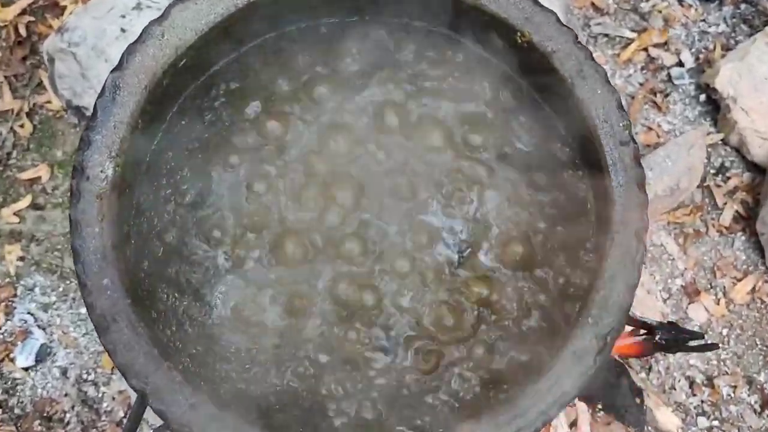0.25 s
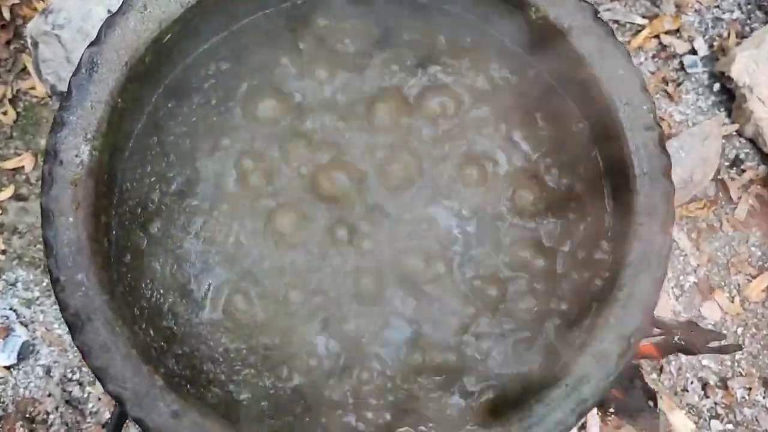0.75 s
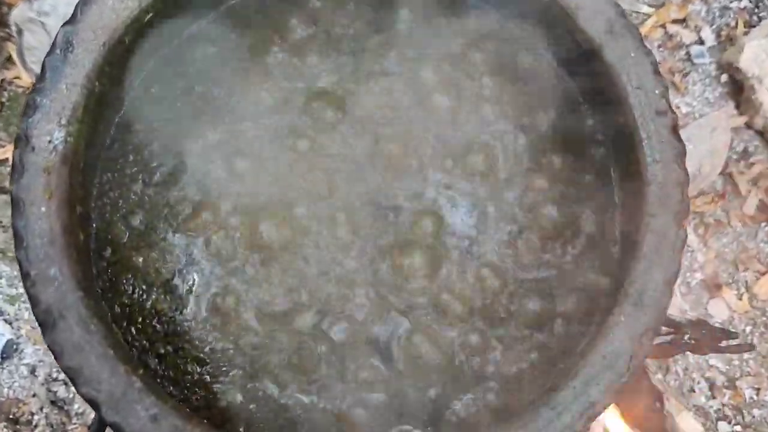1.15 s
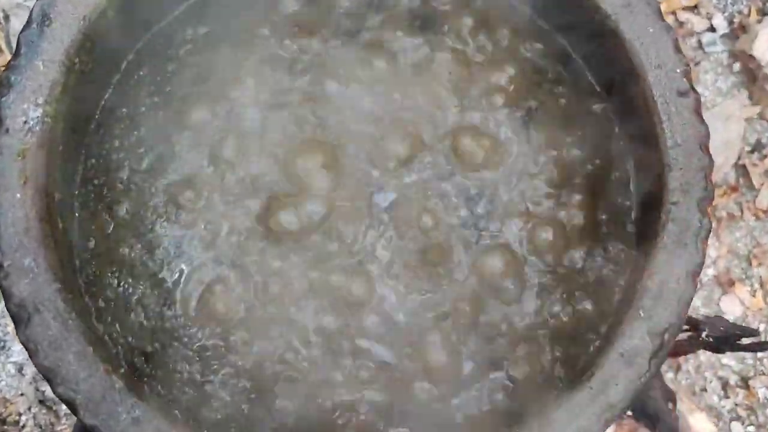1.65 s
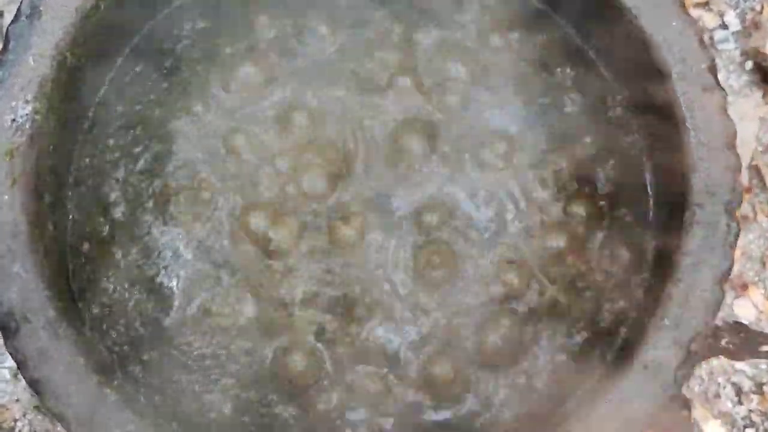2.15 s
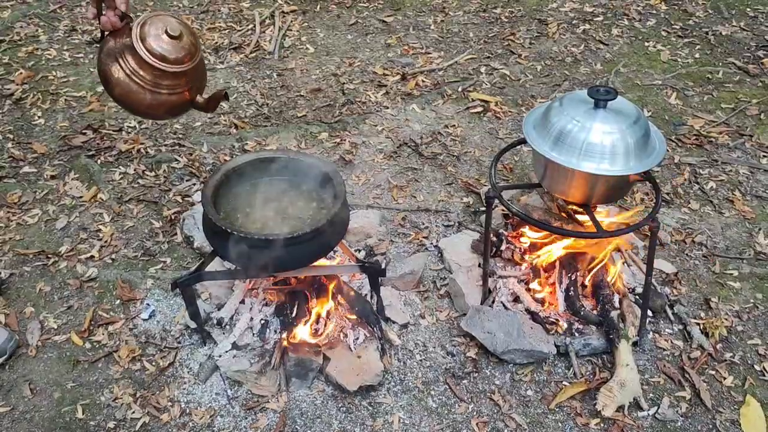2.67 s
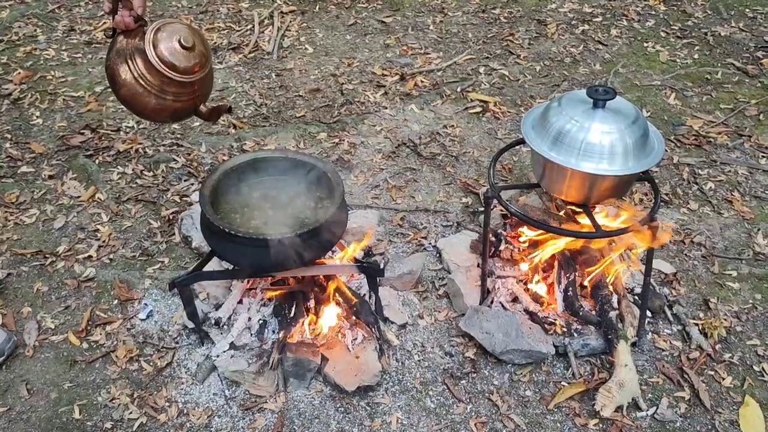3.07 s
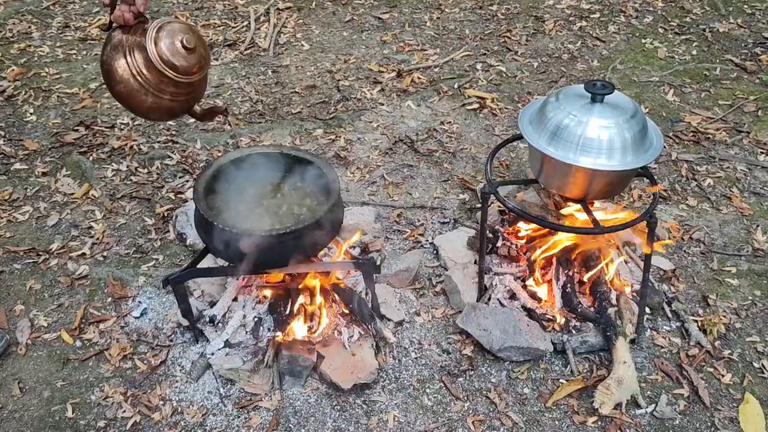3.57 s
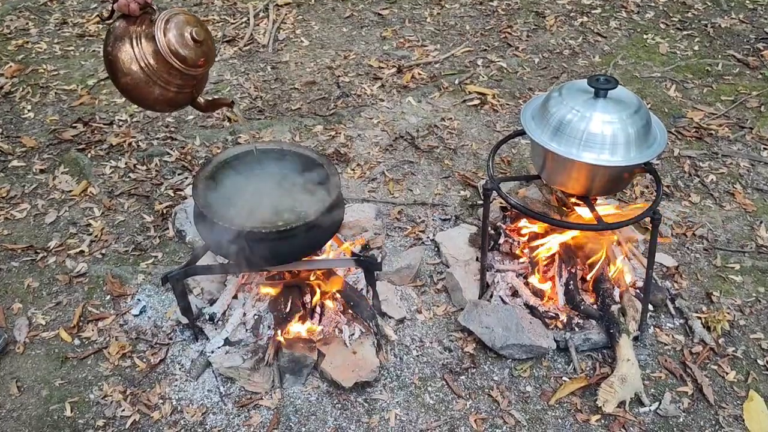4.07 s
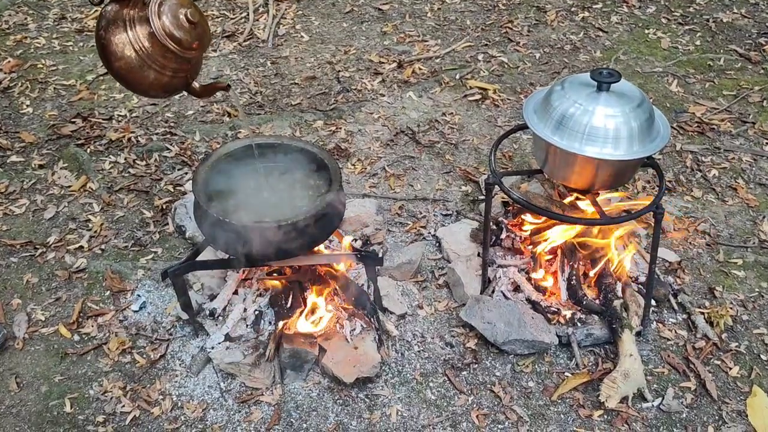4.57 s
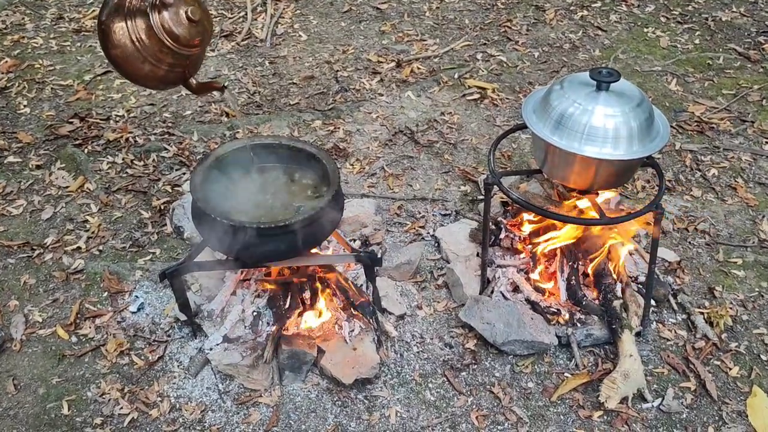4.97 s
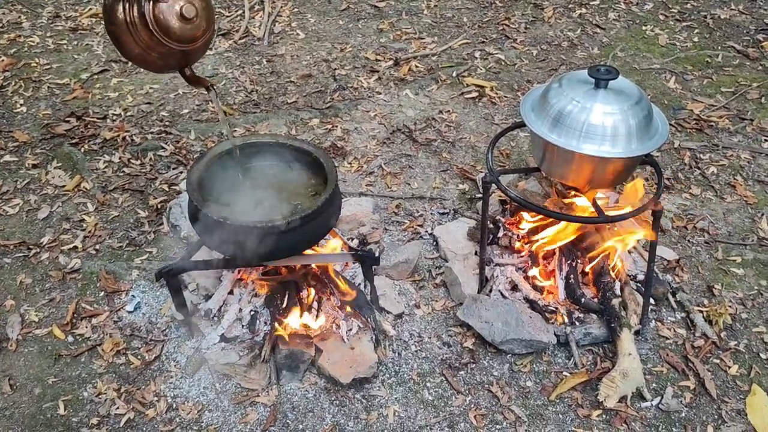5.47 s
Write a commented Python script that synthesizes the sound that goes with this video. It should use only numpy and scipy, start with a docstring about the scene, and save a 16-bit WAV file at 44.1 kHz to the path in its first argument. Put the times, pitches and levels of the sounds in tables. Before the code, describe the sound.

From 0 to 2.24 seconds the microphone is right above a pot of water boiling hard outdoors. Dense low bubbling churns continuously; larger bubbles burst irregularly as short, hollow, upward-chirping blops, with occasional soft low thuds. Beneath is a fluttering flame rumble, above it a thin, wide fizz. A sharp snap comes at 0.24, and a tight group of bright cracks at about 1.4 to 1.57. The sound stops abruptly for a few hundredths of a second, then fades in quickly from 2.28, much quieter and a few steps away: softer bubbling, low fire rumble, faint sizzle and small crackles, including a tick at 3.7. Isolated plinks appear around 3.5. From about 4.2 a thin stream of water lands in the pot, a high glassy trickle with plinks, patter and clumped little splashes, uneven and continuing to the end near 5.7. Clearer cracks strike at 4.9, 5.26 and 5.39. Echoes are short and sparse.

```python
"""Pot boiling over a wood fire

Outdoors, with a microphone just above the pot: water boils hard over rumbling flames, with sharp cracks of
wood and spatter. After a brief silence the view opens a few steps away: softer bubbling, fire, and the
plinks and splashes of a thin stream of water falling from a kettle. Bubbles and drops are decaying sines
that rise in pitch; cracks are short noise bursts; flames are coloured noise; sparse echoes surround them."""
import sys
import numpy as np
from scipy import signal
from scipy.fft import rfft, irfft
from scipy.io import wavfile
from scipy.ndimage import uniform_filter1d

SR = 44100
rng = np.random.default_rng(int(sys.argv[2]) if len(sys.argv) > 2 else 0)


def master(y):
    """Save y as 16-bit WAV."""
    cut = np.clip(np.atleast_2d(y).T, -1, 1)
    pcm = np.round(cut * 32767)  # scale
    wavfile.write(sys.argv[1], SR, pcm.astype(np.int16))


N = 252252
TIME = np.arange(N) / SR
NEAR_END, FAR_START, FADE_S = 2.2405, 2.277, 0.14  # (s) the close view stops, the wide view fades in
TRICKLE_FROM = 4.22  # (s) the stream takes hold
# share of a large bubble or plink that rings on, and its decay time (s)
LINGER, LINGER_S = 0.035, 0.0064
ROUNDING = 0.039  # a bubble that rings long also swells slowly, over this share of its decay time


def amp(db):
    """Decibels to gain."""
    return 10 ** (np.asarray(db) / 20)


def unit(x):
    """Scales to rms 1."""
    return x / np.sqrt(np.mean(x ** 2) + 1e-20)


def read(points, hz):
    """Reads a spectrum on a log-frequency axis."""
    f, value = np.transpose(points)
    return np.interp(np.log(hz + 1), np.log(f + 1), value)


def colour(x, points):
    """Filters by a spectrum in dB."""
    size = x.shape[-1]
    gain = amp(read(points, np.fft.rfftfreq(size, 1 / SR)))
    return irfft(rfft(x) * gain, size)


def add(mix, s, sound):
    """Adds a stereo sound at time s."""
    part = mix[:, max(round(s * SR), 0):][:, :sound.shape[1]]
    part += sound[:, :part.shape[1]]


def wander(size):
    """Smooth random drift of rms 1 that changes over about size samples."""
    smooth = uniform_filter1d(rng.standard_normal(N), size)
    return unit(uniform_filter1d(smooth, size // 2))


def scatter(x, wet_db, t60, width, size=5000):
    """Pot wall, stones and ground return a short spray of echoes, partly shared by both microphone ports."""
    t = np.arange(size) / SR
    sparse = (rng.random((3, size)) < 0.04) * (t > 0.002)
    taps = rng.standard_normal((3, size)) * sparse * amp(-60 * t / t60)
    taps = taps[0] + width * taps[1:]
    taps /= np.linalg.norm(taps, axis=1, keepdims=True)
    echoes = signal.oaconvolve(x.mean(0)[None], taps, axes=1)[:, :N]
    return x + amp(wet_db) * echoes


def ring(hz, decay, glide, lag, side_db, swell=0.52, linger=0, size=1500):
    """A bubble's air pocket swells, rises in pitch and dies, a share lingering; one port hears it later."""
    t = np.arange(size) / SR
    t = np.maximum(t - np.maximum([[lag], [-lag]], 0), 0)
    dying = np.exp(-t / max(decay, 1e-5)) + linger * np.exp(-t / LINGER_S)
    shape = (1 - np.exp(-t * hz / swell)) ** 2 * dying  # swell is in cycles
    wave = np.sin(2 * np.pi * hz * t * (1 + glide * t))
    return amp([[side_db / 2], [-side_db / 2]]) * wave * shape / shape.max()


def bubbles(rows, glide, spread_s, side_db, swell=0.098, linger=0, wide_hz=1300):
    """Each bubble rings at its own place, random unless its row gives one; low random ones sit central."""
    out = np.zeros((2, N))
    draws = rng.standard_normal((len(rows), 3))
    for (s, db, hz, decay, *place), (a, b, c) in zip(rows, draws):
        width = min(hz / wide_hz, 1) ** 2
        side = place[0] if place else side_db * width * c
        slow_swell = swell + ROUNDING * decay * hz
        sound = ring(hz, decay, glide * (1 + a / 2), spread_s * width * b, side, slow_swell, linger)
        add(out, s, amp(db) * sound)
    return out


def swarm(per_s, low_hz, high_hz, cycles, scatter_db, spread_s, side_db, count=120):
    """Countless small bubbles over a range of pitches, most faint and a few strong."""
    out = np.zeros((2, N))
    for hz in np.geomspace(low_hz, high_hz, count):
        a, b, c = rng.standard_normal(3)
        small = hz / high_hz
        decay = cycles * np.exp(a / 3) / hz
        grain = small * ring(hz, decay, 6.0, spread_s * small * b, side_db * small * c, size=900)
        when, strength, chance = rng.random(size=(3, 200))
        live = chance < per_s * TIME[-1] / count / len(chance)
        gains = amp(-scatter_db * np.log(strength[live] + 0.011))
        for s, gain in zip(when[live] * TIME[-1], gains):
            add(out, s, gain * grain)
    return out


def moments(start, end, per_s, count=120):
    """Irregular times, one somewhere in each interval, each with three clipped normal draws of its own."""
    s = start + (np.arange(count) + rng.random(count)) / per_s
    draws = np.clip(rng.standard_normal((count, 3)), -2, 2)
    return s[s < end], *draws[s < end].T


def bubbling(start, end, per_s, db, scatter_db, hz, octaves, cycles, ring_scatter=0.54):
    """Random bubbles of one kind, scattered in level and pitch; those that ring longer peak lower."""
    s, loud, pitch, length = moments(start, end, per_s)
    hz, longer = hz * 2 ** (octaves * pitch), np.exp(ring_scatter * length)
    level = db + scatter_db * loud - 10 * np.log10(longer)
    return np.transpose([s, level, hz, longer * cycles / hz])


def droplets(rows, below_db, after_s, higher, scatter_octaves, cycles, count):
    """Each burst, crack or splash sheds a few bubbles just after it, scattered in pitch and level."""
    s, db, hz = np.repeat(np.array(rows)[:, :3], count, axis=0).T
    delay, pitch, strength = rng.standard_normal((len(s), 3)).T
    hz = np.minimum(hz * higher * 2 ** (scatter_octaves * pitch), SR / 3)
    return np.transpose([s + after_s * abs(delay), db + below_db + 2 * strength, hz, cycles / hz])


# Likeness of the fire at the two ports. Each row: frequency in Hz, left-right correlation (0 to 1).
SAME = [(20, 0.15), (100, 0.98), (700, 0.77), (1400, 0.023), (2500, 0), (16000, 0)]


def flames(spectrum, flutter_db):
    """Fire as fluttering coloured noise: a rumble much alike in both ports under a thin wide hiss."""
    a, b = rfft(rng.standard_normal((2, N)))
    same = np.clip(read(SAME, np.fft.rfftfreq(N, 1 / SR)), -1, 1)
    right = same * a + np.sqrt(1 - same ** 2) * b
    noise = irfft(np.array([a, right]), N)
    return colour(noise, spectrum) * amp(flutter_db * wander(size=1200))


def boil(curve, churn, fizz, fire, churn_db, fizz_db, fire_db):
    """Churning, fizz and flames each follow their own strength curve, plus a trim in dB."""
    s, *levels = np.transpose(curve)
    layers = zip((churn, fizz, fire), levels, (churn_db, fizz_db, fire_db))
    return sum(unit(sound) * amp(np.interp(TIME, s, level) + db) for sound, level, db in layers)


# Strength just above the rim. Each row: time in seconds, then churning, fizz and flames in dB before trims.
BOIL_NEAR = [(0.0, -50.5, -69, -56.5), (0.35, -50.5, -67, -57), (1.5, -49.5, -67.5, -59),
             (2.2, -47.5, -67.5, -60)]
# Colour of the small bubbles up close. Each row: frequency in Hz, gain in dB.
CHURN_NEAR = [(150, -11.5), (300, -15), (450, -12), (640, -2.5), (820, -7.5), (1050, -17.5), (1400, -18.5),
              (1700, -28), (2100, -48.5), (3000, -45.5)]
# Colour of the fizz up close. Each row: frequency in Hz, gain in dB.
FIZZ_NEAR = [(1000, 14), (2100, -15.5), (3100, -3.5), (3900, -9), (5200, -1), (6600, -2.5), (7800, -8.5),
             (9200, -6.5), (10500, -14.5), (12200, -18), (14000, -13.5), (16000, -19)]
# Colour of flames and steam up close. Each row: frequency in Hz, gain in dB.
FLAME_NEAR = [(15, -11), (35, -0.5), (60, -1), (100, 3.5), (180, 1.5), (300, -4.5), (500, 0.5),
              (1000, -12.5), (2000, -22.5), (5000, -26.5), (9000, -31), (16000, -31)]


def near_pot():
    """The boil from just above the rim: swarms of low bubbles churn, swarms of high ones fizz in clumps."""
    churn = swarm(per_s=1100, low_hz=220, high_hz=2200, cycles=1.3, scatter_db=1.8, spread_s=0.0003, side_db=3)
    fizz = swarm(per_s=2700, low_hz=1900, high_hz=14500, cycles=3.8, scatter_db=3.6,
                 spread_s=0.00026, side_db=8)
    fizz = scatter(colour(fizz, FIZZ_NEAR), wet_db=-8.0, t60=0.0097, width=2.1)
    fizz = fizz * amp(1.3 * wander(size=1100))
    fire = flames(FLAME_NEAR, flutter_db=1.6)
    return boil(BOIL_NEAR, colour(churn, CHURN_NEAR), fizz, fire, churn_db=1.0, fizz_db=11.0, fire_db=6.5)


# The largest bubbles bursting. Each row: start in seconds, level in dB before the pot colours it,
# starting pitch in Hz, decay time in seconds, left-right difference in dB.
BUBBLES = [(0.0041, -34.5, 1010, 0.0012, 1), (0.0475, -36, 910, .0005, 4), (0.0689, -29, 830, 0.0021, -2),
           (0.21, -29.5, 1150, 0.00087, 1), (0.2845, -36, 1460, .002, -4), (0.2945, -40.5, 1300, .005, -3),
           (0.375, -29, 1165, 0.0012, 3), (0.4594, -28.5, 984, 0.00095, -5.5),
           (0.4845, -39, 1060, 0.0011, 5), (0.5173, -38, 1350, 0.006, -5), (0.5386, -34, 686, 0.0024, 1),
           (0.592, -32, 806, 0.0018, 1), (0.6293, -29.5, 880, 0.00042, -2), (0.6807, -32.5, 670, 0.0011, 1),
           (0.6875, -31.5, 1320, .0038, 9), (0.6976, -28, 1270, .0035, -2), (0.7183, -38, 1000, 0.0023, -2),
           (0.7398, -38, 790, 0.0029, 3), (0.741, -46, 1270, .002, 1), (0.8102, -39, 790, 0.0027, 1),
           (0.838, -34, 1060, 0.00081, 1), (0.861, -39, 1240, 0.0022, 0), (0.8833, -30.5, 1054, 0.00039, 3),
           (0.9016, -35.5, 574, 0.0019, -1), (0.9591, -42, 550, 0.0012, 6), (1.0265, -36, 770, 0.0016, 0),
           (1.0436, -35.5, 600, 0.0044, 1), (1.1199, -41, 1050, 0.0017, 13), (1.161, -30, 830, 0.00083, 2),
           (1.191, -34.5, 700, 0.0025, 0), (1.2145, -34, 650, 0.0023, 0), (1.216, -40, 1270, .0015, 8),
           (1.2421, -39, 730, 0.0021, 2), (1.261, -36.5, 1320, 0.003, -1), (1.2662, -32.5, 653, 0.0041, 0),
           (1.2997, -37.5, 623, 0.0047, 1), (1.3156, -33, 870, 0.00083, 1), (1.3888, -27.5, 710, 0.0007, 2),
           (1.436, -30.5, 720, 0.0009, 1), (1.491, -35, 1020, 0.00056, 1.5),
           (1.5235, -31.5, 1100, 0.00042, 10), (1.535, -32.5, 1600, 0.0008, -12),
           (1.5733, -31.5, 1280, 0.0015, -8), (1.5858, -35, 533, 0.0023, 3), (1.6487, -32, 677, 0.0059, 1),
           (1.6618, -41, 690, 0.0025, -1), (1.6933, -35.5, 830, 0.002, 0), (1.735, -38, 910, 0.0007, 7),
           (1.7632, -39, 637, 0.0049, 2), (1.8052, -41, 1350, 0.0018, 3), (1.8211, -36, 1250, 0.0022, -1.5),
           (1.8431, -37.5, 780, 0.0038, 2), (1.8638, -25, 902, 0.0014, 2),
           (1.8748, -35, 1460, 0.00077, -11), (1.9208, -37, 610, 0.0023, 2), (1.9225, -40, 1190, 0.0015, 0),
           (1.9645, -38.5, 1220, 0.00077, 11), (1.9875, -32, 585, 0.0021, 1),
           (2.0135, -36, 563, 0.0038, -1), (2.0543, -39.5, 1100, 0.0035, 11), (2.0808, -38, 555, 0.0023, 2),
           (2.0997, -41, 644, 0.0025, 3), (2.1187, -33, 570, 0.0031, 0), (2.1366, -36.5, 874, 0.0019, 4),
           (2.1452, -42, 646, .0025, -4), (2.1845, -38, 603, 0.00096, 1), (2.2083, -27, 1330, 0.0012, 9),
           (2.2229, -36.5, 690, 0.0019, -2.5), (2.3405, -53.5, 803, 0.0061, 3),
           (2.4812, -54, 1230, .003, 1), (2.483, -53, 724, 0.0033, 0), (2.5643, -42.5, 800, 0.002, 0),
           (2.6475, -52, 900, .003, 0), (2.678, -47, 1660, .003, 5), (2.6805, -49.5, 1300, 0.0028, 1),
           (2.696, -52, 1210, .003, 4), (2.729, -49, 860, .002, 0), (2.733, -57, 1300, 0.0031, -2),
           (2.7624, -50, 750, 0.0025, -3), (2.898, -48.5, 1270, 0.0024, 3), (2.9472, -49, 1210, 0.0012, 1),
           (2.9485, -51, 690, 0.0016, 0), (2.9862, -46.5, 1310, .0045, 3), (3.0208, -46, 720, 0.0016, -2),
           (3.0495, -53, 1280, .003, 0), (3.0568, -44.5, 1700, .003, 6), (3.0743, -51, 1310, 0.0028, 4),
           (3.0835, -50.5, 550, .0025, 0), (3.1622, -48.5, 646, .002, 0), (3.163, -45, 1290, 0.002, 0),
           (3.164, -51, 1780, .0025, 3), (3.172, -51, 1760, .003, 6), (3.181, -51, 690, .0025, 0),
           (3.1997, -50, 1195, 0.004, 6), (3.3616, -48, 820, 0.003, -1), (3.4097, -46.5, 1580, 0.0018, 3),
           (3.4225, -51, 1290, 0.0027, -2), (3.537, -49, 580, 0.002, 2), (3.5924, -47, 990, 0.00063, -2),
           (3.598, -51, 730, 0.0021, 2), (3.611, -51, 570, 0.004, 4), (3.664, -53, 730, .0025, 0),
           (3.685, -57, 604, .0025, 0), (3.7346, -46.5, 576, 0.0023, 2), (3.7498, -43.5, 733, 0.0012, -1),
           (3.7535, -50.5, 1290, .0025, 2), (3.773, -51, 1240, 0.0026, 0), (3.7907, -50, 1370, 0.0012, 0),
           (3.8263, -48.5, 714, 0.0013, -2), (3.9039, -50, 673, 0.0061, -1),
           (3.9214, -47, 1130, 0.00088, 0), (3.9704, -51, 580, 0.0039, 1), (4.014, -54, 860, .0025, 0),
           (4.0285, -57, 775, .0025, 0), (4.079, -52, 640, .003, -4), (4.0995, -52, 890, .002, 0),
           (4.1096, -41.5, 1360, 0.00052, -1), (4.2025, -52, 780, 0.0027, 0), (4.2895, -49, 1550, .0015, 0),
           (4.2947, -50, 616, 0.0017, 0), (4.323, -55, 860, .0025, 0), (4.4335, -53, 600, .0025, 0),
           (4.4357, -41, 1330, 0.0018, 1), (4.4534, -50.5, 636, 0.0023, -1), (4.4832, -44.5, 670, .003, 0),
           (4.4874, -40, 1350, 0.0012, -1), (4.532, -47, 614, 0.0012, -2), (4.5945, -50, 630, 0.0019, 0),
           (4.6423, -48.5, 590, 0.003, -1), (4.664, -50, 645, 0.0019, 0), (4.6917, -44, 650, 0.0012, -1),
           (4.7057, -41.5, 1260, 0.0013, 2), (4.7617, -44.5, 600, 0.0023, 0), (4.8679, -49, 696, 0.001, -1),
           (4.8929, -46, 627, 0.0026, -1), (4.8935, -50, 1300, .0015, 2), (4.9535, -47.5, 610, 0.0028, -1),
           (4.9538, -43, 1280, 0.0011, 1), (5.027, -54, 730, .0025, -2), (5.0562, -47, 670, 0.002, 0),
           (5.2057, -42.5, 644, 0.0014, -1), (5.219, -49, 600, .0025, 0), (5.263, -47.5, 616, 0.0013, 0),
           (5.2905, -51, 830, 0.0023, 0), (5.335, -53, 596, .002, 0), (5.3635, -57, 1420, .0025, 0),
           (5.4072, -48, 1260, .004, 0), (5.4342, -52, 610, 0.0023, -1), (5.4795, -49.5, 636, 0.0027, 0),
           (5.481, -48, 1300, 0.003, 2), (5.514, -45.5, 646, 0.0014, 0), (5.5436, -46, 653, 0.0012, -1),
           (5.5854, -48.5, 666, 0.0034, -3), (5.6548, -47.5, 770, 0.002, -1),
           (5.6836, -47.5, 755, 0.0024, -2)]


def rolling():
    """The steady run of ordinary bubbles, big and small, in the close view and then the wide one."""
    close, wide = (0, NEAR_END), (FAR_START + 1.2 * FADE_S, N / SR)
    big, small = dict(hz=700, octaves=0.14, cycles=1.3), dict(hz=1300, octaves=0.14, cycles=3)
    rows = np.vstack([bubbling(*close, per_s=13, db=-45, scatter_db=1.3, **big),
                      bubbling(*close, per_s=3, db=-47, scatter_db=1, **small),
                      bubbling(*wide, per_s=8, db=-57.5, scatter_db=1.3, **big),
                      bubbling(*wide, per_s=3, db=-59, scatter_db=1.2, **small)])
    apart = abs(rows[:, :1] - np.array(BUBBLES)[:, 0]).min(axis=1)
    return rows[apart > 0.017]  # (s) none bursts this close to one of the largest


# The air in the pot lifts some bands of the bubbles and dulls the rest. Each row: frequency in Hz, gain in dB.
POT = [(150, -14), (400, -3), (660, 2), (850, 1), (1050, -1), (1350, -0.5), (1650, -3.5), (2100, -10),
       (4000, -3)]


def bursts():
    """Large and ordinary bubbles chirp upward and leave small ones; torn films flick higher drops."""
    ordinary = rolling()
    parents = np.vstack([np.array(BUBBLES)[:, :4], ordinary])
    small = droplets(parents, below_db=-16, after_s=0.008, higher=1.1, scatter_octaves=0.35, cycles=3, count=2)
    blips = bubbles(BUBBLES, glide=5.5, spread_s=0.00018, side_db=0, swell=0.46, linger=LINGER)
    blips += bubbles(ordinary, glide=11, spread_s=0.00019, side_db=4.0, swell=0.7)
    blips += bubbles(small, glide=25.8, spread_s=0.0003, side_db=11.0, swell=0.62)
    film = droplets(BUBBLES, below_db=-21, after_s=0.004, higher=2.5, scatter_octaves=0.35, cycles=3, count=2)
    flicks = bubbles(film, glide=8, spread_s=0.0002, side_db=5)
    return scatter(colour(blips, POT) + flicks, wet_db=-14, t60=0.07, width=0.5)


# The heaviest low thuds of the rolling water. Each row: start in seconds, level in dB before a trim,
# starting pitch in Hz, decay time in seconds.
THUDS = [(0.2036, -23, 269, 0.00091), (0.564, -27, 169, 0.0011), (0.9469, -35, 274, 0.022),
         (1.0006, -29.5, 173, 0.0083), (1.3856, -29, 255, 0.0039), (5.3498, -34.5, 125, 0.0021)]


def thuds():
    """Rolling water thuds as very low, short bubble rings near the centre."""
    return amp(-10.0) * bubbles(THUDS, glide=1, spread_s=0, side_db=-2)


# What colours every crack. Each row: frequency in Hz, gain in dB.
CRACK_COLOUR = [(500, 4), (2000, -6), (3200, 9.5), (4300, -1), (5900, 7), (7600, 0), (9200, 6.5),
                (11000, -1), (12500, 3), (16000, 3.5)]


def noise_cracks(rows, rise, tail_db, tail_s, rough_db, octaves, apart, size=2048):
    """A noise crack swells in a share of its decay time, dies in uneven spurts and leaves a faint tail."""
    out, t = np.zeros((2, N)), np.arange(size) / SR
    f = np.fft.rfftfreq(size, 1 / SR) + 1
    for s, db, hz, decay, side_db in rows:
        decay = max(decay, 1e-4)
        dying = np.exp(-t / decay) + amp(tail_db) * np.exp(-t / tail_s)
        shape = (1 - np.exp(-t / (rise * decay))) * dying
        spurts = amp(rough_db * unit(uniform_filter1d(rng.standard_normal(size), size=40)))
        band = 1 / (1 + (np.log2(f / hz) / octaves) ** 2)
        noise = rng.standard_normal(size) + apart * rng.standard_normal((2, size))  # shared + own to each port
        noise = colour(irfft(rfft(noise) * band), CRACK_COLOUR)
        crack = unit(noise * shape * spurts) * np.sqrt(np.mean(shape ** 2)) / shape.max()
        add(out, s, crack * amp(db + np.array([[side_db], [-side_db]]) / 2))
    return out


# The loudest snaps of wood and spatter of water. Each row: start in seconds, level in dB before a trim,
# centre frequency in Hz, decay time in seconds, left-right difference in dB.
CRACKS = [(0.2388, -25, 8000, 0.00068, 0), (1.215, -36, 6670, 0.00056, -4),
          (1.424, -29.5, 4200, 0.00021, -1), (1.5273, -33.5, 6800, 0.0004, -1),
          (1.5402, -34, 5550, 0.00061, 0), (1.5551, -22, 8950, 0.00067, 0),
          (1.5673, -25, 7900, 0.00049, -2), (2.9394, -47, 3380, 0.00085, -3),
          (3.3648, -49, 6600, .0015, -1), (3.4375, -47.5, 5770, 0.0017, 4), (3.635, -49.5, 5240, 0.0014, 0),
          (3.689, -40.5, 9000, 0.00094, -4), (3.82, -49, 5900, 0.0012, 3), (4.2905, -45, 5600, 0.0018, -4),
          (4.38, -46.5, 5800, 0.0015, -6), (4.403, -65, 7000, 0.00092, 2), (4.464, -45.5, 5040, 0.0027, -3),
          (4.483, -48, 8600, 0.0021, 1), (4.694, -47, 8700, 0.0014, -13), (4.7616, -47, 8940, 0.0016, -2),
          (4.772, -52, 8000, 0.00092, -8), (4.805, -43, 7800, 0.0012, -4), (4.8927, -35, 8160, 0.0015, -3),
          (5.263, -35, 11000, 0.0011, -2), (5.303, -50, 8050, 0.0027, 2), (5.335, -46.5, 6860, 0.0011, 2),
          (5.386, -35.5, 5200, 0.0016, 0), (5.515, -41.5, 9000, 0.00054, -4),
          (5.585, -46, 5530, 0.0033, -1)]


def cracks_and_spatter():
    """Wood snaps and water spatter crack as band-limited noise and sputter on; far ones echo off the ground."""
    cracks = amp(-5.5) * noise_cracks(CRACKS, rise=0.53, tail_db=-22.0, tail_s=0.003, rough_db=2.5,
                                      octaves=0.69, apart=2.9)
    add(cracks, 0.0032, amp(-11) * cracks * (TIME > FAR_START))  # ground echo, 3.2 ms later
    sputter = droplets(CRACKS, below_db=-23, after_s=0.013, higher=0.855, scatter_octaves=0.51,
                       cycles=2.2, count=4)
    return cracks + bubbles(sputter, glide=3, spread_s=0.0001, side_db=4, swell=0.7)


# The loudest drops landing in the water. Each row: start in seconds, level in dB before a trim,
# starting pitch in Hz, decay time in seconds.
PLINKS = [(0.2978, -50, 6600, .0012), (0.4845, -61, 2850, .0015), (0.5266, -46.5, 2940, 0.0011),
          (0.634, -56, 2780, 0.0014), (0.703, -55, 2830, 0.0012), (1.3271, -50.5, 4120, 0.0013),
          (1.5548, -43, 3960, 0.0011), (1.599, -58, 3260, .0015), (1.697, -56, 3280, .002),
          (1.8215, -42, 2840, 0.0017), (1.8645, -49, 2370, .003), (1.9545, -35, 3800, 0.00027),
          (2.1967, -48, 6630, 0.0013), (2.9375, -62.5, 2070, 0.0021), (3.4924, -48, 5330, 0.00091),
          (3.5437, -59.5, 3200, 0.0025), (3.6257, -57.5, 3230, 0.0014), (3.8825, -62, 3300, .0015),
          (4.0135, -61, 3010, .0012), (4.3011, -57, 3140, 0.0044), (4.3215, -57, 3370, 0.0022),
          (4.3489, -59, 3280, 0.0022), (4.4653, -49.5, 3730, 0.002), (4.5152, -48.5, 3100, 0.0013),
          (4.6936, -58.5, 3080, 0.0035), (4.7339, -60, 3320, 0.0016), (4.7563, -58, 3250, 0.0031),
          (4.8636, -55, 3240, 0.0032), (4.9541, -57, 2320, 0.0013), (4.9846, -57, 3190, .002),
          (5.022, -51.5, 3220, 0.003), (5.0625, -64, 2750, 0.0016), (5.124, -59, 3100, .002),
          (5.2265, -67, 1930, .0025), (5.2837, -70, 3060, .002), (5.3845, -57.5, 3200, 0.0016),
          (5.561, -63, 2750, .002), (5.5837, -48, 3160, 0.0023)]
# Clumps of drops splashing into the pot. Each row: start in seconds, typical level of a drop in dB,
# centre pitch in Hz.
SPLASHES = [(3.49, -62, 6500), (4.238, -68, 2600), (4.288, -62, 2550), (4.513, -57.5, 5560),
            (4.62, -61.5, 5230), (4.753, -62, 7500), (4.86, -58, 5200), (4.924, -59.5, 6070),
            (4.983, -54, 5300), (5.02, -65, 5250), (5.058, -63, 8500), (5.102, -65, 6470),
            (5.143, -55.5, 6500), (5.163, -69, 5560), (5.191, -55, 5700), (5.205, -56, 8000),
            (5.253, -62, 5500), (5.283, -66, 5500), (5.319, -62, 8000), (5.458, -55, 4840),
            (5.475, -51, 6900), (5.528, -60, 5300), (5.543, -56, 6050), (5.56, -68, 3400),
            (5.585, -61, 4760), (5.618, -77, 4550), (5.651, -60, 5200)]


def falling_drops():
    """Drops ring: plinks of many sizes, a trickle near one pitch, their spray, splashing clumps and patter."""
    trickle = bubbling(TRICKLE_FROM, N / SR, per_s=10, db=-65, scatter_db=1.5, hz=3250, octaves=0.12, cycles=8.1)
    drops = np.vstack([PLINKS, trickle])
    plinks = amp(6.0) * bubbles(drops, glide=2.3, spread_s=0.00005, side_db=5.5, swell=0.5, linger=LINGER)
    splash = droplets(SPLASHES, below_db=0, after_s=0.008, higher=1, scatter_octaves=0.36, cycles=5.5, count=8)
    spray = droplets(drops, below_db=-10, after_s=0.006, higher=1.1, scatter_octaves=0.4, cycles=4, count=4)
    patter = bubbling(TRICKLE_FROM, N / SR, per_s=42, db=-68, scatter_db=2, hz=4200, octaves=0.42, cycles=6)
    fine = bubbles(np.vstack([splash, spray, patter]), glide=3, spread_s=0.0001, side_db=4, swell=0.7)
    return plinks + fine


# Strength a few steps away. Each row: time in seconds, then churning, fizz and flames in dB before trims.
BOIL_FAR = [(2.45, -67.5, -88, -67.5), (2.62, -65, -89, -62.5), (2.69, -63.5, -75.5, -65),
            (3.59, -63.5, -71.5, -67.5), (4.08, -64, -76.5, -66), (5.3, -65, -68, -67),
            (5.68, -67.5, -76.5, -66)]
# Colour of the small bubbles from there. Each row: frequency in Hz, gain in dB.
CHURN_FAR = [(150, 1), (400, -19), (520, 4), (660, 3), (830, 2.5), (1030, -17), (1320, -1.5), (1600, -34),
             (1900, -13), (2300, -38), (3000, -70)]
# Colour of the fizz from there. Each row: frequency in Hz, gain in dB.
FIZZ_FAR = [(1000, 21.5), (2100, -6.5), (3200, -0.5), (4200, -4.5), (5600, 2), (7500, -2), (9200, -2.5),
            (11000, -5), (16000, -25)]
# Colour of flames and steam from there. Each row: frequency in Hz, gain in dB.
FLAME_FAR = [(15, 6), (35, 1.5), (60, 1), (120, 4.5), (200, 0.5), (330, -9.5), (600, -10.5), (1000, -36),
             (2000, -26), (5000, -30.5), (9000, -35.5), (12000, -31.5), (14000, -26.5), (16000, -28)]


def far_pot():
    """The boil from a few steps away: the same kinds of swarm, softer, with more of the fire."""
    churn = swarm(per_s=630, low_hz=285, high_hz=2290, cycles=1.2, scatter_db=3.2, spread_s=0.00018, side_db=1.5)
    fizz = swarm(per_s=2400, low_hz=1600, high_hz=11000, cycles=2.2, scatter_db=2.8, spread_s=0.0001, side_db=5)
    fizz = scatter(colour(fizz, FIZZ_FAR), wet_db=6.5, t60=0.016, width=0.45)
    fizz = fizz * amp(1.5 * wander(size=900))
    fire = flames(FLAME_FAR, flutter_db=1.5)
    return boil(BOIL_FAR, colour(churn, CHURN_FAR), fizz, fire, churn_db=1.0, fizz_db=3.0, fire_db=5.0)


# The thin stream stirring the surface. Each row: time in seconds, level in dB.
POUR = [(3.3, -79.5), (4.15, -76.5), (4.3, -68.5), (4.55, -74), (4.75, -69.5), (5.1, -82), (5.72, -70)]
# Colour of its spatter. Each row: frequency in Hz, gain in dB.
SPATTER = [(800, -27), (1300, 5), (1900, -3), (2500, -3), (3250, 8), (4100, -2), (5800, 6), (7500, -1),
           (9200, 3), (12000, -2)]


def pour():
    """The stream breaks into clumps of tiny drops, a swarm of rings that swells and thins."""
    drops = swarm(per_s=600, low_hz=1000, high_hz=10500, cycles=4, scatter_db=4.2,
                  spread_s=0.00018, side_db=7, count=60)
    clumps = colour(drops, SPATTER) * amp(2.3 * wander(size=700))
    spatter = scatter(clumps, wet_db=-1, t60=0.041, width=3.6)
    return unit(spatter) * amp(np.interp(TIME, *np.transpose(POUR)))


def from_left(x, lag_s):
    """Sound from the left reaches the right port a little later."""
    delay = np.exp(-2j * np.pi * np.fft.rfftfreq(N, 1 / SR) * lag_s)
    return np.array([x[0], irfft(rfft(x[1]) * delay, N)])


def scene():
    """The close view, a brief silence, then the wide view from the left; single events start unfaded."""
    crackle = scatter(cracks_and_spatter() + falling_drops(), wet_db=-9, t60=0.05, width=4)
    events = bursts() + crackle + thuds()
    near = np.clip((NEAR_END - TIME) / 0.002, 0, 1)
    fade = np.clip(0.029 + (TIME - FAR_START) / FADE_S, 0, 1)
    wide = (TIME > FAR_START) * (fade * (far_pot() + pour()) + events)
    return near * (near_pot() + events) + from_left(wide, lag_s=0.000075)


# Tilt between the two microphone ports. Each row: frequency in Hz, left-right difference in dB.
PORTS = [(100, -1), (350, -0.5), (600, 1), (900, 0), (1300, 1), (1900, 0.5), (2500, -0.5), (3500, -1.5),
         (5500, 1), (8500, -0.5), (11000, -7), (12500, 8.5), (15000, 2)]


def record(dry):
    """The two microphone ports colour the sound differently; then a low-pass limits the band."""
    tilt = np.array(PORTS, float)
    ports = np.array([colour(dry[0], tilt * [1, 0.5]), colour(dry[1], tilt * [1, -0.5])])
    lowpass = signal.firwin(401, 16100, window=("kaiser", 8), fs=SR)  # edge in Hz
    return signal.oaconvolve(ports, lowpass[None], "same")


dry = scene()
out = record(dry)
master(out)
```